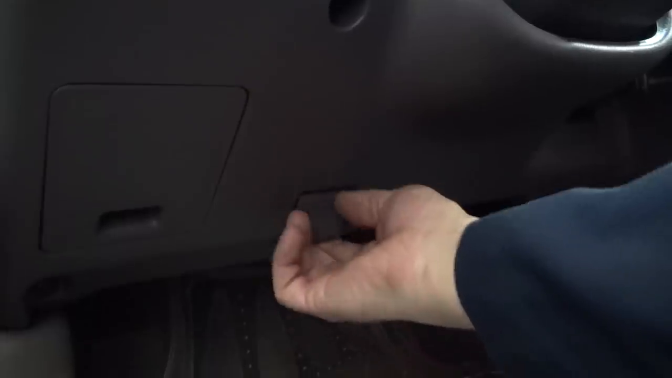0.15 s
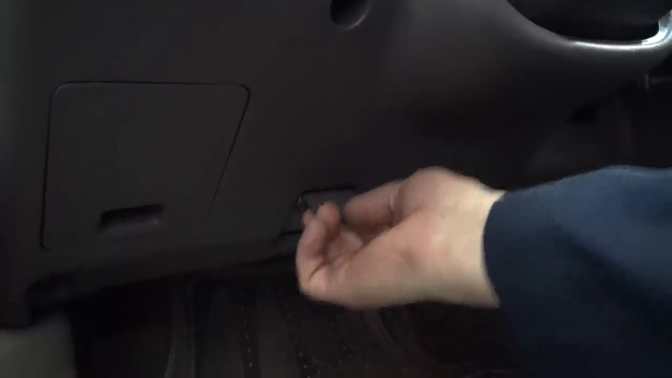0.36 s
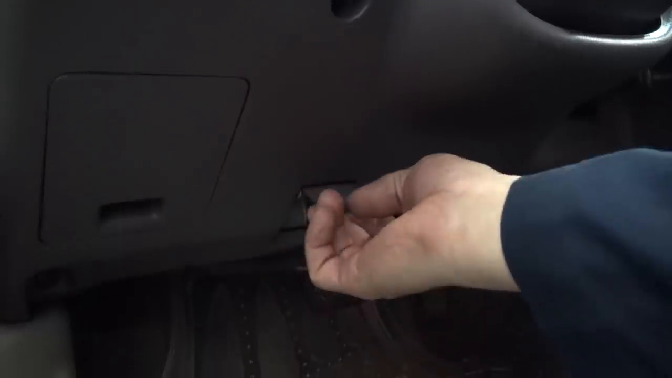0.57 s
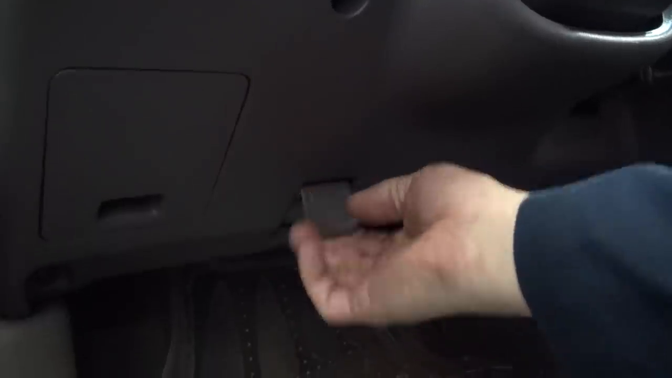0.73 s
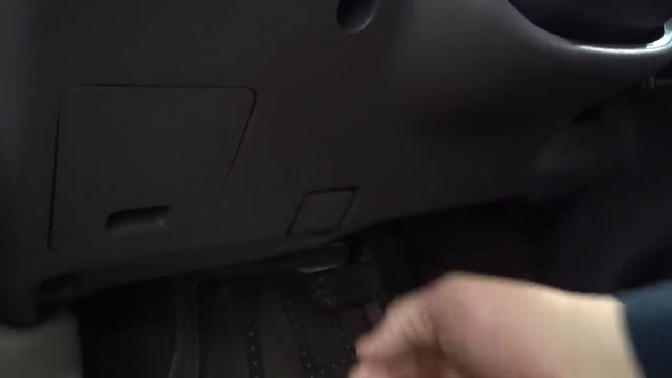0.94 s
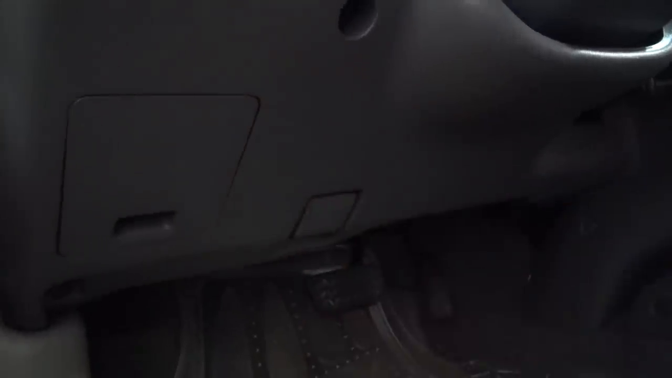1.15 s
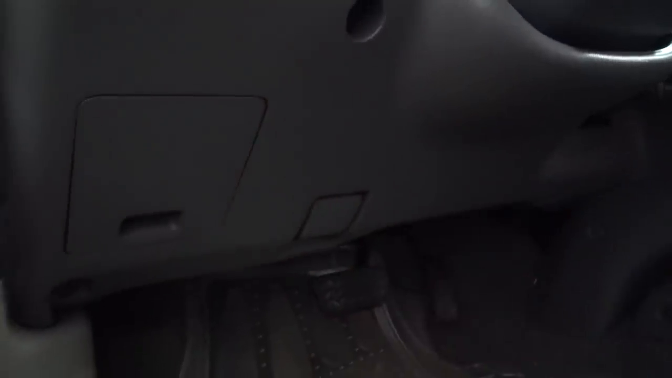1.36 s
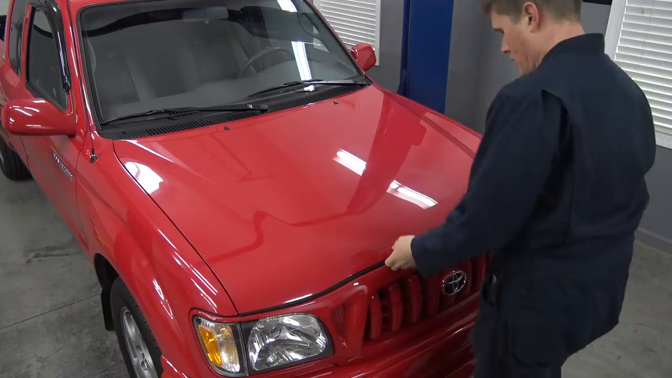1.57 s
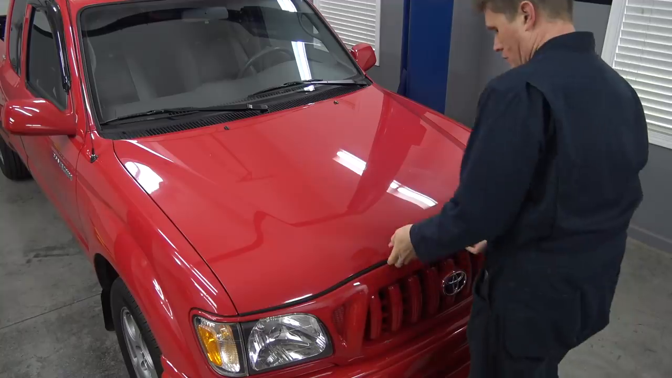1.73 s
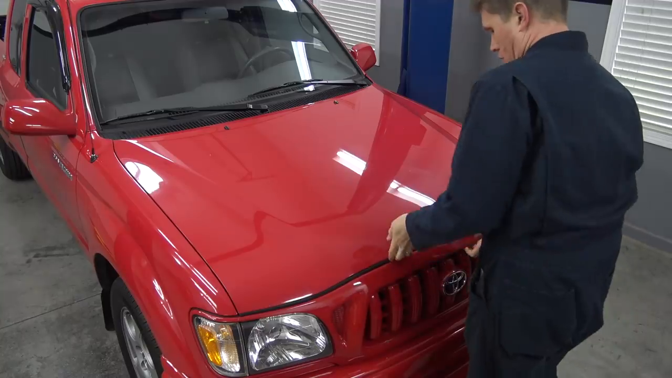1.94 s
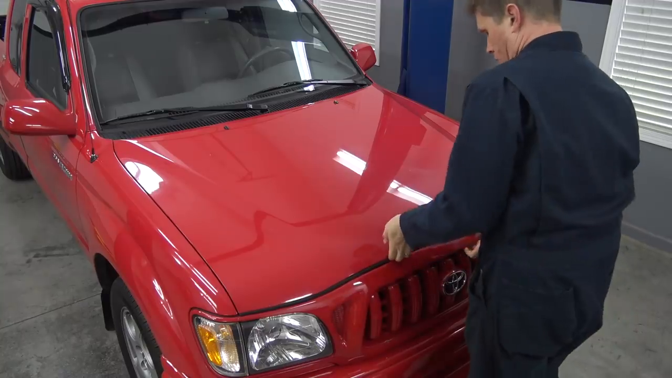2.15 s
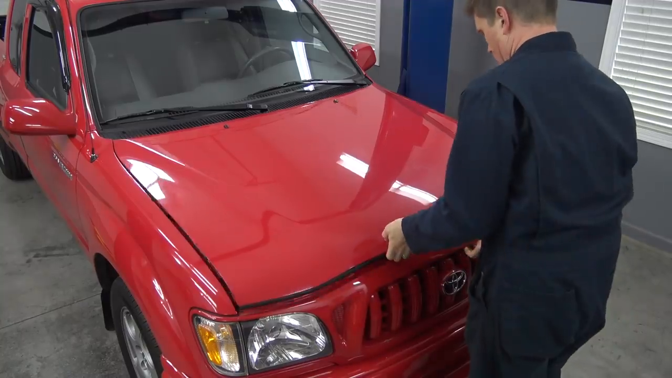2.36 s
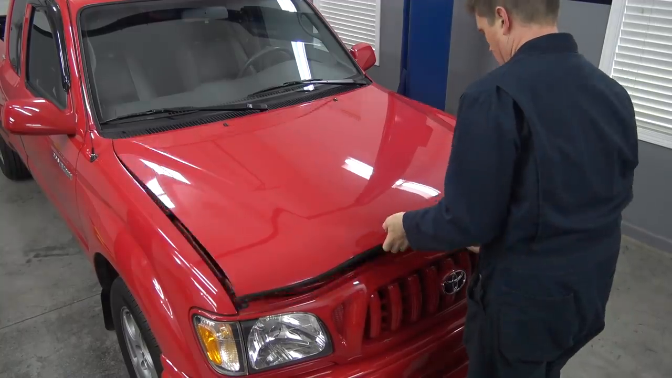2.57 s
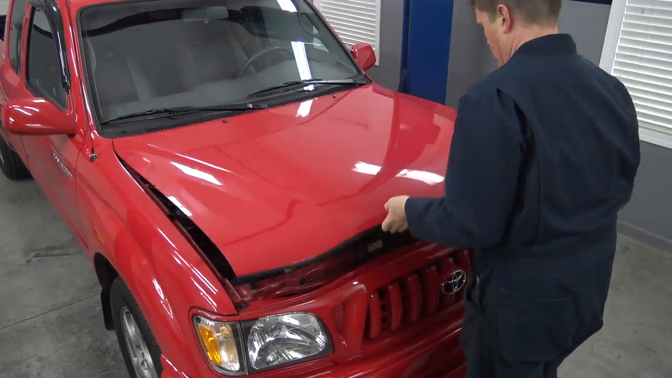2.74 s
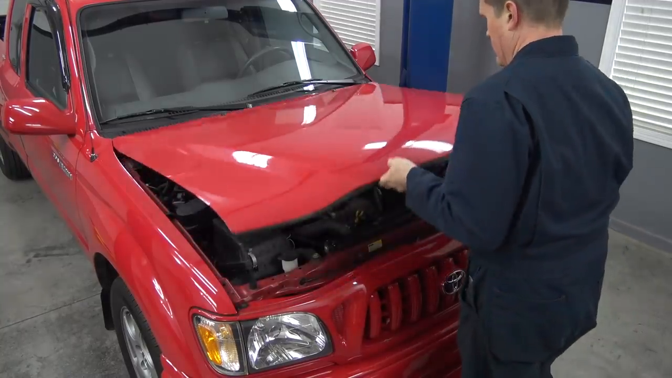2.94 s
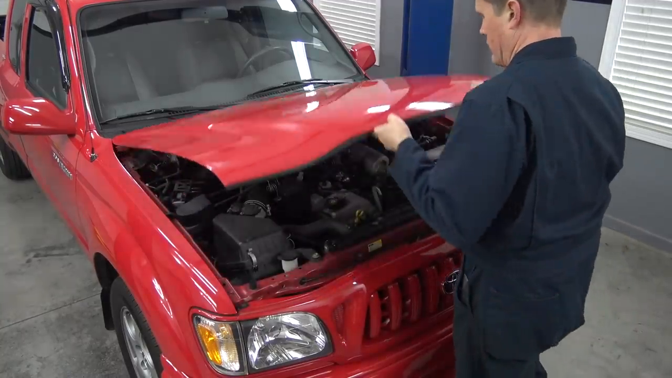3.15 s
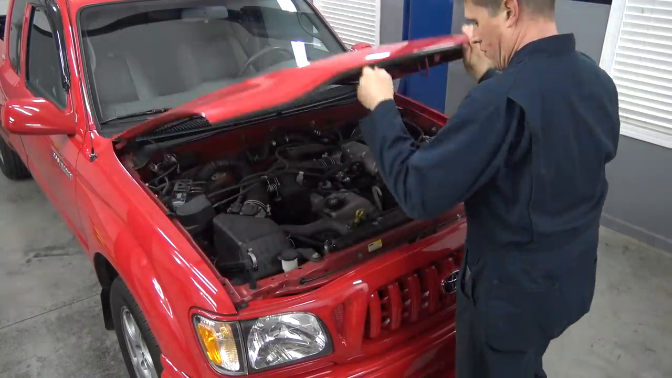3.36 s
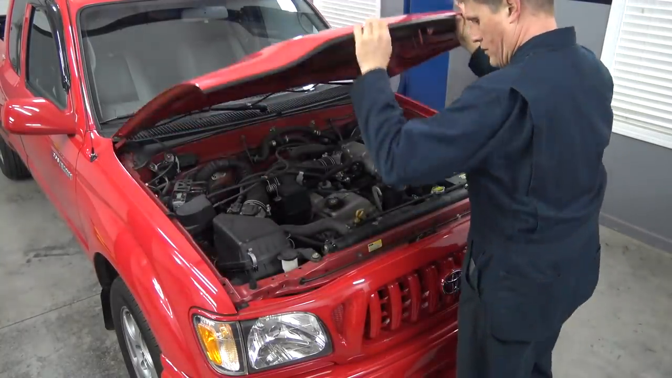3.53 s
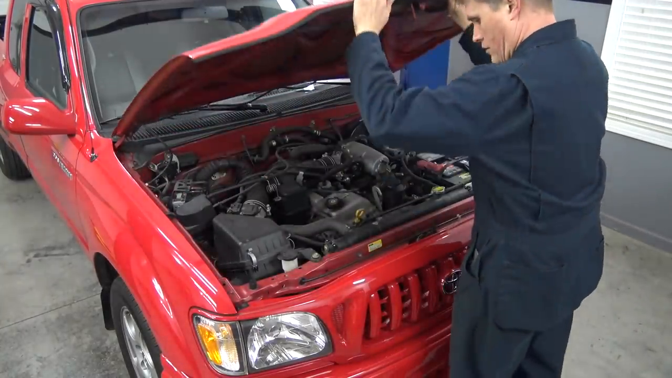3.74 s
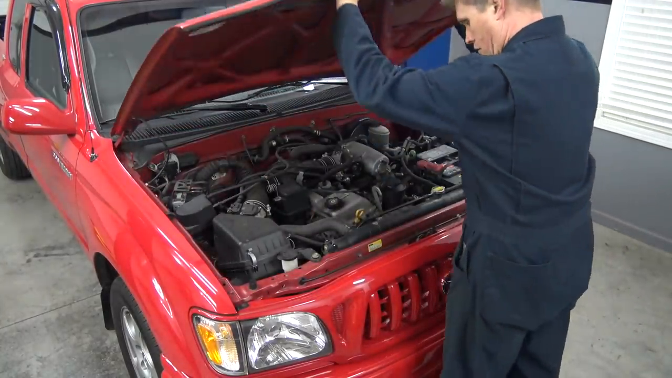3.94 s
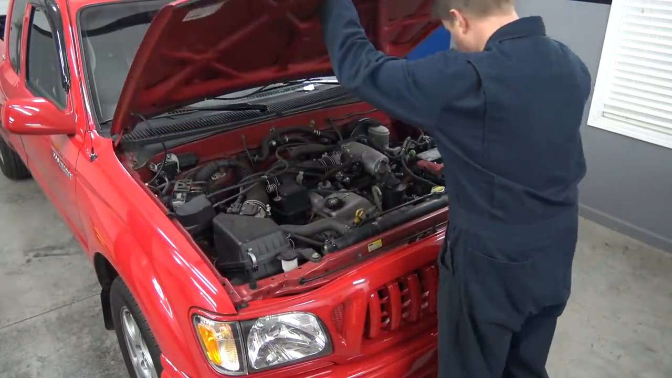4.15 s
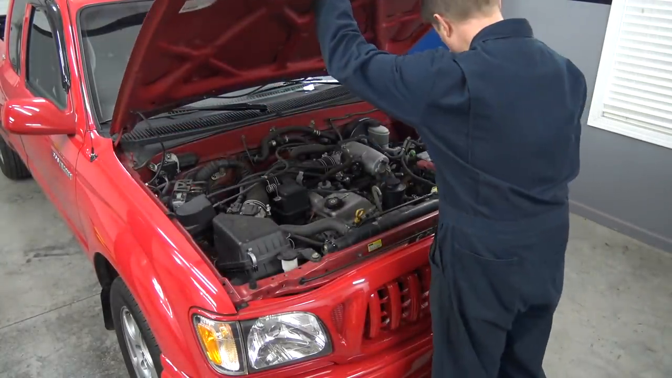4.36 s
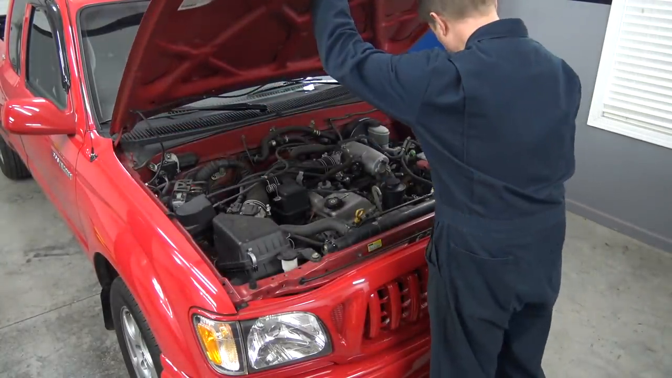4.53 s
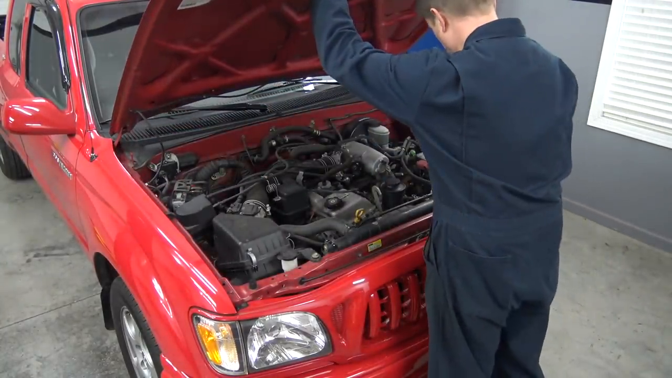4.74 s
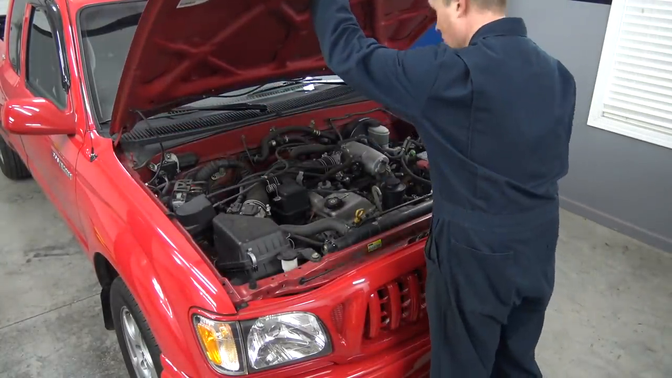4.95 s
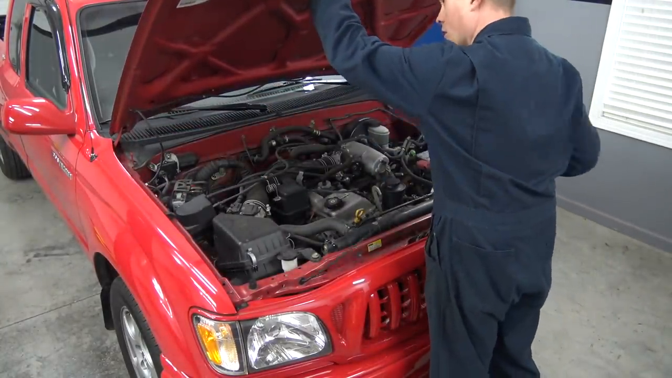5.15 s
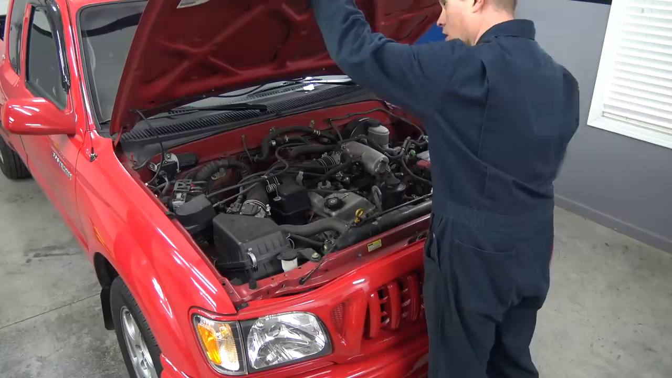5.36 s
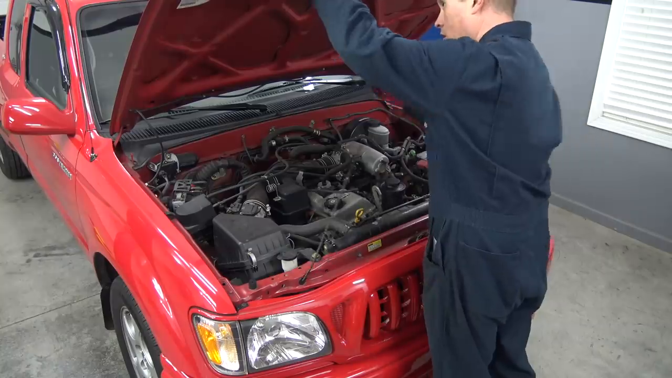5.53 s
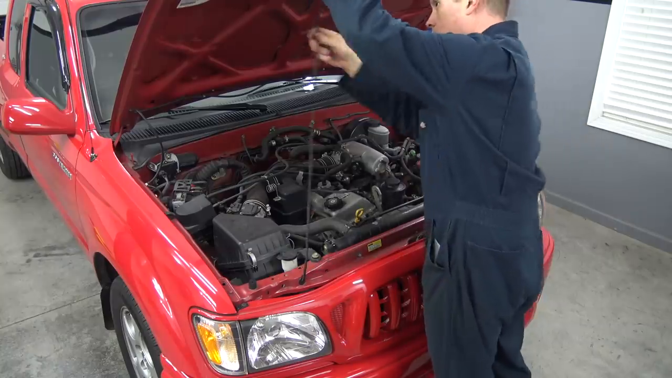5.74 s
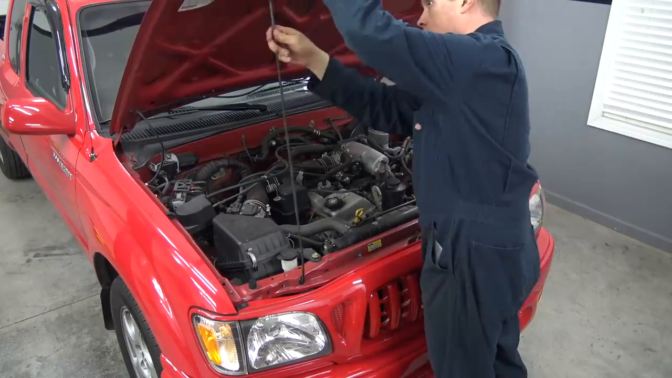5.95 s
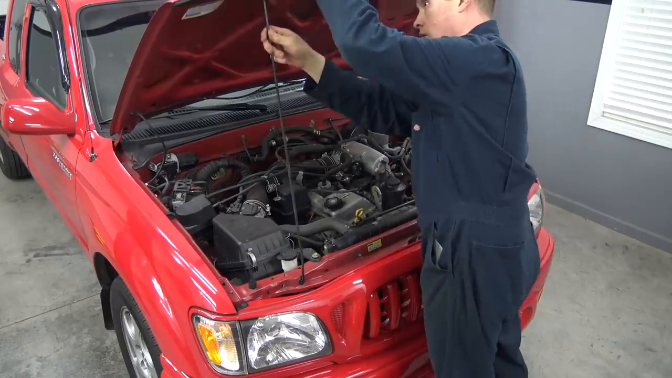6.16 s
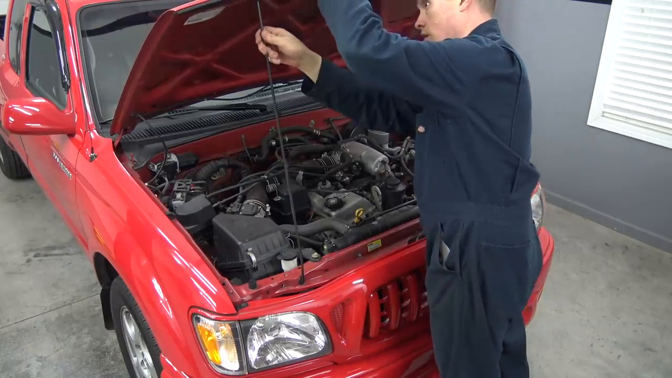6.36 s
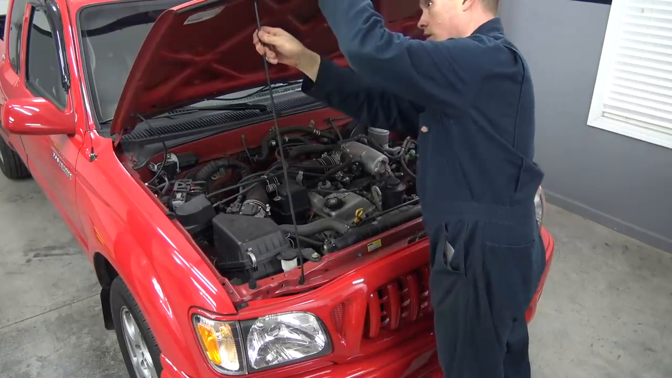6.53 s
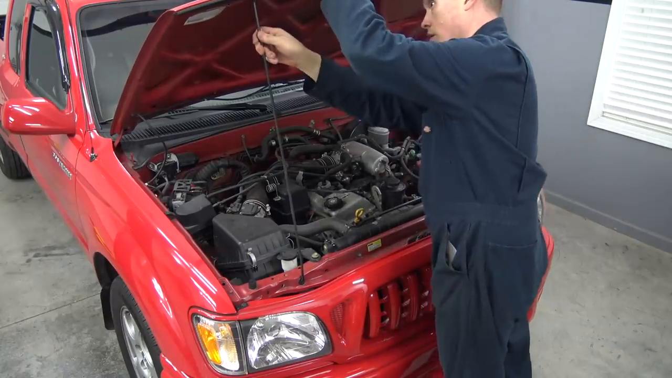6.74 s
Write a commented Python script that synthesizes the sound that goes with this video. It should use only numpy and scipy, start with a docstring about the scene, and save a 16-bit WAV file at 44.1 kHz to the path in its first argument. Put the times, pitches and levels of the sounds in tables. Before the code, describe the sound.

Close to the microphone in a truck's cab, a sleeve brushes softly and a plastic lever clicks. At about 0.45 seconds the hood latch pops with a muffled thump, a brief chatter and a low boom. Around 0.85 seconds the lever snaps back sharply. From 1.5 seconds the sounds are a few steps away in an echoing garage with faint room tone: feet shuffle and overalls swish. Between 2.3 and 2.7 seconds the steel safety catch clanks several times, its spring ringing and the hood flexing hollowly. Soft rustles and light knocks follow until about 4 seconds as the hood rises. At 4.5 seconds the prop rod drags in its clip with a faint groan, then snaps free with a metallic ring at 5 seconds. The hood takes a hollow knock near 6.4 seconds, then lighter taps, and at 6.8 seconds the rod clatters loudly into its slot.

```python
"""Opening a pickup's hood in a garage

Two close capsules in the driver's footwell: a plastic lever pulls the cable, the latch pops and
chatters, and the lever snaps back. Then from a few steps in front of the truck: the safety catch
clanks, the sheet-steel hood is lifted, and the prop rod is tugged from its clip and knocked into its
slot. Each blow is a crack, a rattle, ringing modes and echoes; overalls rustle in between."""
import sys
import numpy as np
from scipy import signal
from scipy.fft import rfft, irfft
from scipy.io import wavfile

SR = 44100
rng = np.random.default_rng(int(sys.argv[2]) if len(sys.argv) > 2 else 0)


def master(y):
    """Save y as 16-bit WAV."""
    cut = np.clip(np.atleast_2d(y).T, -1, 1)
    pcm = np.round(cut * 32767)  # scale
    wavfile.write(sys.argv[1], SR, pcm.astype(np.int16))


N = 304016
SIZE = 65536   # samples in one blow with its echoes
TIME, HZ = np.arange(SIZE) / SR, np.fft.rfftfreq(SIZE, 1 / SR)


def from_db(db):
    """Decibels to gain."""
    return 10 ** (np.asarray(db) / 20)


def unit(x):
    """Scale to an energy of one."""
    return x / np.sqrt(np.sum(x ** 2) + 1e-20)


def at_hz(points, hz):
    """Read a table on a log-frequency axis."""
    known_hz, values = np.transpose(points)
    return np.interp(np.log(np.maximum(hz, 1)), np.log(known_hz), values)


def add(out, sound, s):
    """Mix a sound in from time s on."""
    start = max(round(s * SR), 0)
    out[start:start + len(sound)] += sound[:N - start]


def crowded_modes(depth_db, spacing_hz):
    """Countless overlapping resonances, as dB ripples along frequency; the bass has few of them."""
    ripples = np.clip(rng.standard_normal(SIZE), -3, 1.3)
    return depth_db * HZ / (HZ + 250) * np.interp(HZ / spacing_hz, np.arange(SIZE), ripples)


def noise(colour, ripple_db=0):
    """Steady noise of a given colour, rms 1."""
    gain = from_db(at_hz(colour, HZ) + crowded_modes(ripple_db, spacing_hz=35.6))
    spectrum = rfft(rng.standard_normal(N)) * np.interp(np.fft.rfftfreq(N, 1 / SR), HZ, gain)
    return unit(irfft(spectrum, N)) * np.sqrt(N)


def strokes(rows, attack_s, release_t60):
    """Gain of a run of movements: each swells, holds for its length and dies away."""
    t, power = np.arange(N) / SR, 0
    for s, length, db in rows:
        rise_s = attack_s + 0.079 * length   # a long movement gathers speed more slowly
        swell = 1 - np.exp(-np.maximum(t - s, 0) / rise_s)
        release_db = -60 * np.maximum(t - s - length, 0) / release_t60
        power = power + (swell * from_db(db + release_db)) ** 2
    return np.sqrt(power)


def grain(per_s, depth_db):
    """Uneven catching and slipping of a rubbed surface, as a gain."""
    return from_db(depth_db * np.interp(np.arange(N) * per_s / SR, np.arange(N), rng.standard_normal(N)))


def coloured(x, colour_db, tilt):
    """Minimum-phase filter with this colour and tilt (dB/octave); white input keeps its energy."""
    gain = from_db(colour_db + tilt * np.log2(np.maximum(HZ, 200) / 1000))
    cepstrum = irfft(np.log(gain / np.sqrt(np.mean(gain ** 2))))
    cepstrum[1:SIZE // 2] *= 2
    cepstrum[SIZE // 2 + 1:] = 0
    return irfft(rfft(x) * np.exp(rfft(cepstrum)))


def tails(decay, count):
    """Diffuse echoes: noise in overlapping bands, each dying at its own rate; one tail a row."""
    centres, t60s = np.transpose(decay)
    white = rfft(rng.standard_normal((count, SIZE)))
    bands = [at_hz(np.c_[centres, own], HZ) for own in np.eye(len(centres))]
    return sum(irfft(white * band) * from_db(-60 * TIME / t60) for band, t60 in zip(bands, t60s))


def blows(rows, colour, decay, crack_db, tail_db, ripple_db=3):
    """Each blow is a crack, a dense short rattle of the part and the echoes of the space."""
    out = np.zeros(N)
    body_db = at_hz(colour, HZ) + crowded_modes(ripple_db, spacing_hz=45.26)
    build_up = 1 - np.exp(-TIME / 0.0036)   # echoes take a moment to gather
    for (s, db, tilt, rattle_t60), tail in zip(rows, tails(decay, count=len(rows))):
        rattle = unit(rng.standard_normal(SIZE) * from_db(-60 * TIME / rattle_t60))
        rattle[0] += from_db(crack_db)
        echoes = from_db(tail_db) * unit(tail * build_up)
        add(out, from_db(db) * coloured(rattle + echoes, body_db, tilt), s)
    return out


def ring(hz, db, t60):
    """One decaying mode."""
    return np.sin(2 * np.pi * hz * TIME) * from_db(db - 60 * TIME / t60)


def ringing(rows, modes, share_db):
    """The lasting modes of a part; the point of contact decides how strongly each answers a blow."""
    out = np.zeros(N)
    rings = np.array([ring(*mode) for mode in modes])
    octaves = np.log2(np.array(modes)[:, 0])
    for s, db, tilt, _ in rows:
        strengths = from_db(tilt * octaves + rng.normal(0, 0.61, len(modes)))
        signs = rng.choice([-1, 1], len(modes))
        add(out, from_db(db + share_db) * unit((strengths * signs) @ rings), s)
    return out


def notes(rows, attack_s=0):
    """Single modes, each struck at its own time."""
    out = np.zeros(N)
    swell = 1 - np.exp(-TIME / attack_s) if attack_s else 1
    for s, hz, db, t60 in rows:
        add(out, ring(hz, db, t60) * swell, s)
    return out


# room tone of the garage: (frequency [Hz], level [dB])
AIR_COLOUR = [(15, -50), (25, -5.5), (53, -9.5), (102, 0), (236, -4), (277, 2.5), (344, -11), (405, -1.5),
              (516, -6), (936, -8), (6560, -25), (14800, -28), (16000, -49)]

def garage_air():
    """Still air all around the microphones: a faint, low noise."""
    return from_db(-52) * noise(AIR_COLOUR, ripple_db=0.5)


# in the cab, strongest after latch and lever: (start [s], length [s], level [dB])
BOOM = [(0.0, .04, -43.5), (.455, 0.26, -36), (.9, 0.082, -37), (1.405, .02, -49)]
# its rumble: (frequency [Hz], level [dB])
BOOM_COLOUR = [(15, -18), (28, -11), (37, -12), (50, -15), (90, -20), (200, -75)]

def cab_boom():
    """The cab booms around the microphones as the body rocks."""
    return strokes(BOOM, attack_s=0.011, release_t60=0.66) * noise(BOOM_COLOUR)


# the arm reaches in and draws back: (start [s], length [s], relative level [dB])
SLEEVE = [(0.0, 0.071, -53.5), (.2, 0.22, -51.5), (.96, .42, -48.5)]
# cloth at close range: (frequency [Hz], level [dB])
CLOTH_NEAR = [(290, -38), (500, -33), (819, -3), (1090, -8), (1510, -9.5), (5630, -11), (12000, -18.5),
              (16000, -34)]

def sleeve():
    """A sleeve brushes the dashboard, close to the microphones."""
    movement = from_db(3.5) * strokes(SLEEVE, attack_s=0.0058, release_t60=0.86)
    return movement * noise(CLOTH_NEAR) * grain(320, depth_db=0.5)


# clicks in the footwell: (time [s], energy [dB], brightness [dB/octave], rattle t60 [s])
LEVER = [(.075, -14, -7, 0.042), (.092, -16.5, 0, 0.11), (.246, -9.5, -4.5, 0.092), (.254, -5.5, 3, 0.055),
         (.268, -1.5, -1.5, 0.049), (.283, 0, -9.5, 0.17), (.418, -4.5, -1, 0.21), (.801, 2, -1, 0.049),
         (.815, 6, -1, 0.5), (.845, 11, 1.5, 0.032), (.855, 9, 9, 0.15), (.860, 12.5, -2.5, 0.048),
         (.867, 12, -2, 0.084), (.874, 10.5, -4, 0.16), (.887, 2, 0.5, 0.24)]
# the plastic, close up: (frequency [Hz], level [dB])
LEVER_COLOUR = [(41, -63), (70, -44), (145, -9.5), (228, -3), (336, -2.5), (385, -5), (727, -2),
                (797, -6.5), (1100, 1), (1510, -4), (2600, -5.5), (4690, -10.5), (10600, -19.5),
                (16000, -40)]
# its modes: (frequency [Hz], level [dB], t60 [s])
LEVER_MODES = [(144.2, 13, 0.21), (233, -5, 2.9), (387, -4, 1.35), (576.4, 4, 0.79), (831, 7, 0.71),
               (1090, -12, .3), (1108, -3, 1.56), (1300, -9, 0.96), (1980, -12, 0.73)]
# pivot and stops ping as they slip: (time [s], frequency [Hz], peak [dB], t60 [s])
PIVOT_PINGS = [(.085, 2500, -39, 0.083), (0.253, 1360, -24, 0.056), (.254, 8900, -40, .03),
               (0.267, 5630, -17.5, 0.0094)]
# echoes inside the cab: (frequency [Hz], t60 [s])
CAB_DECAY = [(60, 0.71), (250, 1.14), (1100, 1.41), (4000, 1.22), (9000, 0.68), (15000, 0.63)]

def release_lever():
    """The plastic lever is taken up, then let go against the dashboard."""
    clicks = blows(LEVER, LEVER_COLOUR, CAB_DECAY, crack_db=-8, tail_db=-9.5)
    return clicks + ringing(LEVER, LEVER_MODES, share_db=-9) + notes(PIVOT_PINGS)


# steps and shifts in both places: (start [s], length [s], relative level [dB])
SHUFFLE = [(.08, 0.27, -39.5), (1.12, .15, -45), (1.625, 0.11, -36), (1.945, 0.037, -43.5),
           (2.23, 0.14, -38), (3.375, .008, -38), (4.05, 0.099, -44), (5.76, .22, -47)]
# their dull scuff: (frequency [Hz], level [dB])
SHUFFLE_COLOUR = [(29, -50), (50, -15), (123, 8), (176, -1), (345, -1), (420, -9), (528, -12), (686, -9.5),
                  (1240, -14.5), (2500, -20.5), (3250, -73), (5500, -120)]

def shuffling():
    """Feet and body shuffle, catching and slipping."""
    movement = from_db(-5.5) * strokes(SHUFFLE, attack_s=0.0021, release_t60=0.89)
    return movement * noise(SHUFFLE_COLOUR, ripple_db=8.5) * grain(30, depth_db=3.5)


# thumps just above the footwell: (time [s], frequency [Hz], level [dB], t60 [s])
THUMPS = [(.4445, 158, -8, 0.18), (0.471, 470, -27, 0.18), (0.35, 212, -26.5, 0.083),
          (1.381, 271, -27.5, 0.072)]

def dashboard():
    """The cable jerks and the dashboard, a moment behind, thumps."""
    return notes(THUMPS, attack_s=0.0023)


# the latch trips and settles: (time [s], energy [dB], brightness [dB/octave], rattle t60 [s])
LATCH = [(.443, 7.5, 1.5, 0.094), (.605, -8, 2, 0.055), (.665, -2.5, -7, .25), (0.719, -10, 0.5, 0.093),
         (.765, -3.5, 1, 0.18)]
# heard from the cab, through the bulkhead: (frequency [Hz], level [dB])
LATCH_COLOUR = [(29, -45), (50, -40), (87, 4), (119, -0.5), (291, -7), (398, -6), (507, -12), (884, -17),
                (1020, -22.5), (1240, -19.5), (3030, -31.5), (8140, -37.5), (12300, -47.5), (16000, -59)]
# its modes: (frequency [Hz], level [dB], t60 [s])
LATCH_MODES = [(96.9, -6, 0.81), (159, 0, 0.19), (180, -5, 0.98), (395.6, 3, 0.41), (456, 2, 0.26),
               (612, -4, 0.27), (876, -6, 0.24), (1280, -3, 0.13)]

def latch():
    """The hood jumps on its spring and the freed latch chatters, ever slower, weaker and looser."""
    pop_s, pop_db, fade_db_per_s, tilt = 0.447, 13, 105, 0.7
    rows, after_s = list(LATCH), 0
    for k in range(5):
        rattle_t60 = 0.14 * 1.27 ** k
        rows.append((pop_s + after_s, pop_db - fade_db_per_s * after_s, tilt, rattle_t60))
        after_s += 0.0085 * 1.8 ** k
    chatter = blows(rows, LATCH_COLOUR, CAB_DECAY, crack_db=-6, tail_db=-4, ripple_db=2.5)
    return chatter + ringing(rows, LATCH_MODES, share_db=-3)


# quick scuffs out in the garage: (time [s], energy [dB], brightness [dB/octave], t60 [s])
SWISHES = [(1.564, -6, -1, 0.26), (1.60, -9.5, -1.5, .35), (1.68, -13, -5.5, 0.4), (3.82, -13.5, 0, 0.81),
           (3.93, -7, -1, 0.98), (3.965, -6, 0.5, 0.48), (4.06, -16.5, 4.5, 0.96)]
# the arms rise with the hood, then with the rod: (start [s], length [s], level [dB])
RUSTLE = [(2.258, .02, -63), (3.25, 0.6, -56), (3.38, 0.018, -48), (5.44, .5, -57.5), (6.07, 0.01, -59)]
# swish and rustle from a few steps away: (frequency [Hz], level [dB])
SWISH_COLOUR = [(350, -39), (600, -8.5), (1160, -7), (1280, -5), (1410, -6), (3780, -0.5), (8620, -6.5),
                (16000, -22)]
CLOTH_FAR = [(1470, -28), (2500, -7.5), (4990, -8.5), (5690, -8), (12300, -14), (16000, -29)]
# echoes of the garage: (frequency [Hz], t60 [s])
GARAGE_DECAY = [(80, 0.6), (210, 1.35), (560, 1.5), (1500, 1.56), (4000, 1.27), (7000, 0.93), (10000, 0.58),
                (15000, 0.42)]

def overalls():
    """Rubbing cloth swishes and rustles, farther from the microphones."""
    swishes = blows(SWISHES, SWISH_COLOUR, GARAGE_DECAY, crack_db=-21, tail_db=0)
    movement = strokes(RUSTLE, attack_s=0.0027, release_t60=0.48)
    return swishes + movement * noise(CLOTH_FAR) * grain(600, depth_db=1)


# hands, hinges and rod tip knock: (time [s], energy [dB], brightness [dB/octave], rattle t60 [s])
HOOD_KNOCKS = [(2.104, -13.5, 0.5, 0.082), (2.262, -11.5, 0, 0.49), (2.328, -2.5, 0, 0.36),
               (3.379, -13.5, 4, 0.08), (3.528, -8.5, 0, 0.076), (3.64, -18, 0, 0.054),
               (4.05, -16.5, 0.5, 0.25), (6.356, 6, 3.5, 0.1), (6.367, 7, -1, 0.16),
               (6.378, 8, -1.5, 0.041), (6.453, -5, -0.5, 0.11), (6.570, -3.5, -9.5, 0.042),
               (6.620, -2.5, -8, .08)]
# the panel from in front of the truck: (frequency [Hz], level [dB])
HOOD_COLOUR = [(41, -33), (70, -31.5), (129, -13.5), (240, -16), (314, -7.5), (360, -14.5), (451, -2),
               (541, -17), (606, -11.5), (934, -18), (1690, -23), (4690, -42), (7220, -39), (16000, -61.5)]
# its modes: (frequency [Hz], level [dB], t60 [s])
HOOD_MODES = [(133, -13, 2.7), (191, -2.5, 1.6), (311, -8, 1.0), (438, 3, 0.83), (430, -7, 0.26),
              (615, 11.5, 0.47), (560, 5, .5), (726, 3, .5), (870, 2, 0.48), (1260, -18, 0.87),
              (1440, -9, 0.59), (1670, -4, 1.0), (2160, -5, 1.0)]
# its hollow note as it flexes: (time [s], frequency [Hz], level [dB], t60 [s])
HOOD_FLEX = [(2.365, 432, -13.5, 0.13), (2.441, 436, -12, 0.12), (2.668, 438, -14, 0.17),
             (3.522, 435, -30, 0.085), (6.370, 452.5, -7.5, 0.15), (6.561, 440, -12.5, 0.078),
             (6.615, 450, -15.5, 0.14)]

def hood():
    """Sheet steel is knocked and flexes; a few steps away, the echoes match the direct sound."""
    knocks = blows(HOOD_KNOCKS, HOOD_COLOUR, GARAGE_DECAY, crack_db=-20, tail_db=-0.5)
    flex = notes(HOOD_FLEX, attack_s=0.0092)   # the wide sheet takes a few cycles to get going
    return knocks + ringing(HOOD_KNOCKS, HOOD_MODES, share_db=-7.5) + flex


# under the hood's front edge: (time [s], energy [dB], brightness [dB/octave], rattle t60 [s])
CATCH = [(2.358, 11, 4, 0.1), (2.364, 8.5, -2, 0.037), (2.376, 8, -3.5, 0.087), (2.437, 8, 2.3, 0.11),
         (2.451, 9, -2, 0.083), (2.476, 0, -8.5, 0.21), (2.528, -3.5, 0.5, 0.055), (2.650, 1.5, -1, 0.12),
         (2.678, -2, -1.5, 0.18), (3.005, -29, 5, .05)]
# the catch from a few steps away: (frequency [Hz], level [dB])
CATCH_COLOUR = [(40, -28), (75, -11), (115, -1.5), (260, -4.5), (440, -0.5), (560, -6.5), (730, -3),
                (1050, -7), (1950, -4.5), (3900, -13), (6800, -15.5), (8300, -19), (12000, -28.5),
                (16000, -45)]
# modes of catch and spring: (frequency [Hz], level [dB], t60 [s])
CATCH_MODES = [(145, 3, 0.55), (372, -4, 1.2), (445, -12, 0.8), (425, 1, 1.2), (790, 11.5, 1.5),
               (1229.7, -1.5, 2.3), (1970, -4, 3.2), (2000, -4, 0.91), (2250, -10, .9), (2250, -13, 1.9),
               (2600, -12, 1.1), (3180, 11, 0.62)]
SPRING_MODES = [(5017, -1, .7), (5460, -12, 1), (6040, -7, 1), (6200, -4, 1), (6440, -6, .5),
                (6578, 10, 1.0), (7747, -5, 0.6), (9000, -6, 0.64), (10090, -12, 0.5)]

def safety_catch():
    """The steel catch clanks and sets the latch spring singing."""
    clanks = blows(CATCH, CATCH_COLOUR, GARAGE_DECAY, crack_db=-26, tail_db=2.5)
    spring = ringing(CATCH, SPRING_MODES, share_db=-18)
    return clanks + ringing(CATCH, CATCH_MODES, share_db=-10.5) + spring


# tugs on the prop rod: (start [s], length [s], groan [dB], hiss [dB])
TUGS = [(4.514, 0.02, -51, -47.5), (4.543, 0.017, -43.5, -64), (4.616, 0.022, -35.5, -53),
        (4.65, .025, -50.5, -47.5), (4.757, 0.029, -44.5, -48.5)]
# groan and dry hiss from a few steps away: (frequency [Hz], level [dB])
GROAN_COLOUR = [(150, -39), (250, -7.5), (420, -3), (631, -7.5), (737, 0), (908, -11.5), (1150, -2.5),
                (1270, -11), (1770, -5), (3000, -20.5), (3900, -19), (6600, -120)]
HISS_COLOUR = [(1500, -30), (2500, -9), (5000, -4), (10400, -4.5), (13200, -8), (16000, -19)]

def rod_drag():
    """The rod drags through its clip: a groan lingers in the garage, a hiss dies quickly."""
    groan = strokes([(s, length, db) for s, length, db, _ in TUGS], attack_s=0.0027, release_t60=1.32)
    groan *= noise(GROAN_COLOUR, ripple_db=4.5) * grain(90, depth_db=-0.5)
    hiss = strokes([(s, length, db) for s, length, _, db in TUGS], attack_s=0.008, release_t60=0.66)
    hiss *= noise(HISS_COLOUR, ripple_db=5) * grain(900, depth_db=2.5)
    return groan + hiss


# rod against clip: (time [s], energy [dB], brightness [dB/octave], rattle t60 [s])
ROD_SNAPS = [(4.621, -14, -3, 0.04), (4.655, -12.5, -2.5, 0.11), (5.0025, 7.5, 5.5, 0.027),
             (5.007, 6.5, -1.5, 0.18), (5.018, 7.5, -3, 0.072), (5.028, -1, -1.5, 0.013),
             (5.040, 3, -4, 0.0082)]
# the rod from a few steps away: (frequency [Hz], level [dB])
ROD_COLOUR = [(30, -26), (90, -13.5), (170, -5), (300, -6), (650, -2.5), (1200, -1), (1950, -9.5),
              (3000, -7), (3550, -17.5), (4200, -8.5), (5100, -15), (7300, -16.5), (8600, -27),
              (16000, -46)]
# its modes: (frequency [Hz], level [dB], t60 [s])
ROD_MODES = [(452, -1, 1.9), (618, 9, 1.1), (887, 5, 0.95), (1060, -18, 0.54), (1172, 5, 1.3),
             (1635, 3, 0.97), (2323, 4, 0.52), (2850, 0, 0.63), (3820, -5, 0.65), (4100, -17, 1.1),
             (4450, -5, 0.85), (4520, -17, 0.76), (6260, -8, 0.56), (6450, 1, 0.18)]

def rod_unclipped():
    """The steel rod works loose, snaps out of its clip and rings."""
    snaps = blows(ROD_SNAPS, ROD_COLOUR, GARAGE_DECAY, crack_db=-27, tail_db=0.5, ripple_db=3.5)
    return snaps + ringing(ROD_SNAPS, ROD_MODES, share_db=-5)


# rod against raised hood: (time [s], energy [dB], brightness [dB/octave], rattle t60 [s])
SLOT = [(6.819, 3, -1.5, 0.074), (6.826, 8, -1, 0.059), (6.838, 15.5, -2, 0.13), (6.850, 12.5, 2.5, 0.067),
        (6.859, 15, -2.5, 0.083), (6.876, 11, -1, 0.051), (6.885, 13, -1.5, .08)]
# the slot from in front of the truck: (frequency [Hz], level [dB])
SLOT_COLOUR = [(41, -39), (70, -32), (162, -9), (244, -24), (307, -8), (727, -3), (913, -5.5), (1470, -4.5),
               (3110, -16.5), (3410, -14), (7390, -25), (14300, -41), (16000, -61)]

def rod_seated():
    """The rod scrapes into its slot and takes the weight; hood and rod both ring."""
    scrape = blows(SLOT, SLOT_COLOUR, GARAGE_DECAY, crack_db=-18, tail_db=-13, ripple_db=5.5)
    return scrape + ringing(SLOT, HOOD_MODES, share_db=-7.5) + ringing(SLOT, ROD_MODES, share_db=-10)


def capsules(mid, width, lean):
    """Two close capsules hear nearly the same, with small differences of level and phase."""
    hz = np.fft.rfftfreq(N, 1 / SR)
    level_apart = (from_db(at_hz(lean, hz)) - 1) / 2
    phase_apart = 1j * from_db(at_hz(width, hz))
    side = irfft(rfft(mid) * (level_apart + phase_apart), N)
    return np.array([mid + side, mid - side])


# width at the microphone pair in each place: (frequency [Hz], side minus mid [dB])
CAB_WIDTH = [(60, -27), (150, -31), (380, -24), (950, -24), (2380, -26), (5980, -26), (15000, -36)]
GARAGE_WIDTH = [(60, -26), (200, -20.5), (380, -22), (700, -21), (1290, -29), (2380, -32), (4400, -39.5),
                (15000, -31)]
# its balance in each place: (frequency [Hz], left minus right [dB])
CAB_LEAN = [(60, 1.5), (150, -1), (380, 1.5), (950, 2.5), (2380, 1), (5980, 1), (15000, -0.5)]
GARAGE_LEAN = [(60, 0.0), (150, -0.5), (380, 0.0), (950, 0.088), (2380, 0.0), (5980, 0.0), (15000, 0.0)]

def scene():
    """The release in the cab, then the work at the front of the truck, over the air of the garage."""
    cab = cab_boom() + release_lever() + dashboard() + latch()
    person = sleeve() + shuffling() + overalls()
    steel = hood() + safety_catch() + rod_drag() + rod_unclipped() + rod_seated()
    garage = garage_air() + person + steel
    return capsules(cab, CAB_WIDTH, CAB_LEAN) + capsules(garage, GARAGE_WIDTH, GARAGE_LEAN)


def record(dry):
    """Peaks are rounded and the top is cut."""
    cutoff_hz = 16100
    lowpass = signal.ellip(10, .1, 90, cutoff_hz, fs=SR, output="sos")
    return signal.sosfilt(lowpass, np.tanh(dry))


dry = scene()
out = record(dry)
master(out)
```